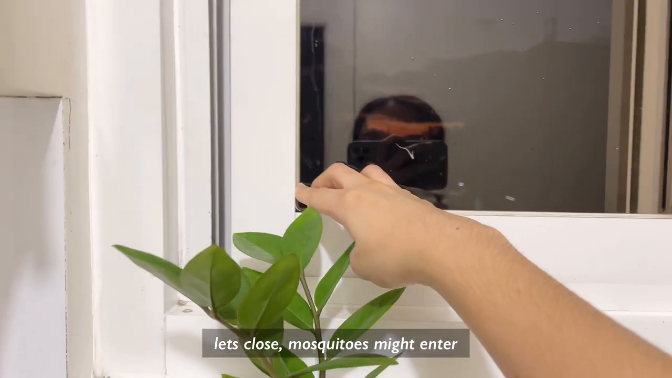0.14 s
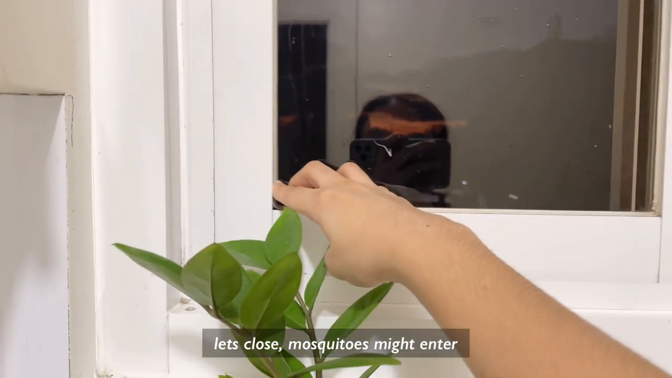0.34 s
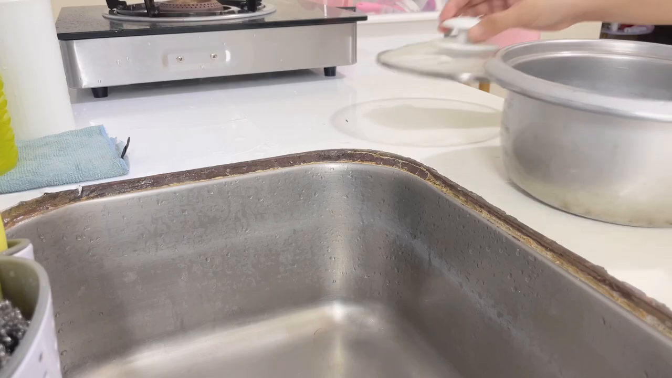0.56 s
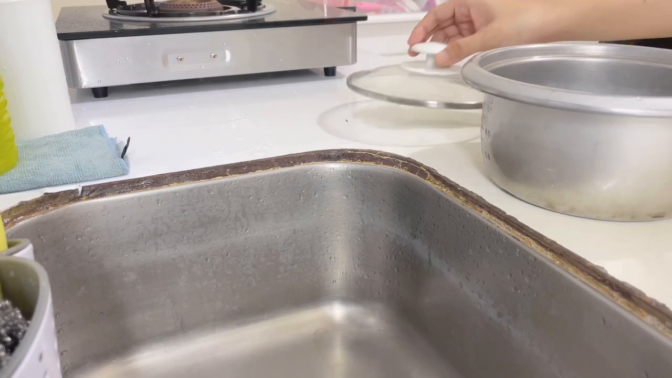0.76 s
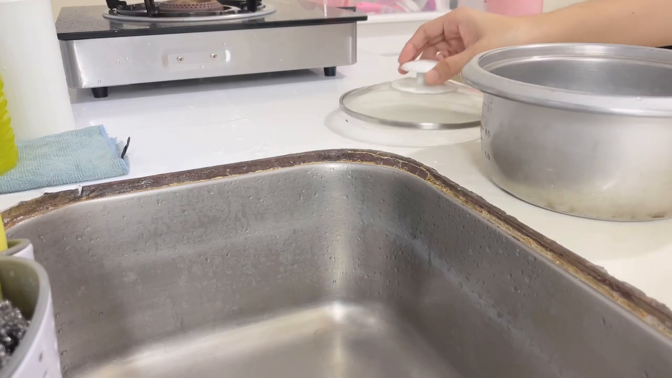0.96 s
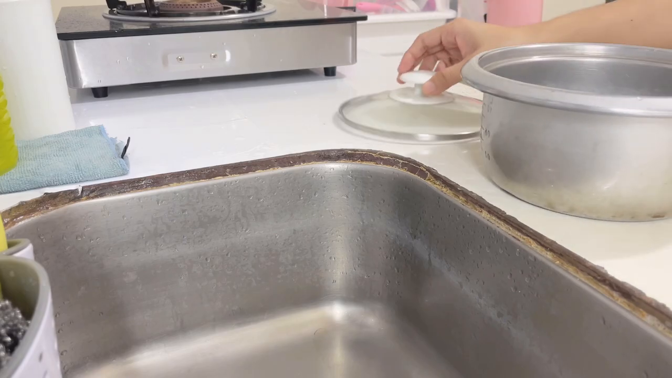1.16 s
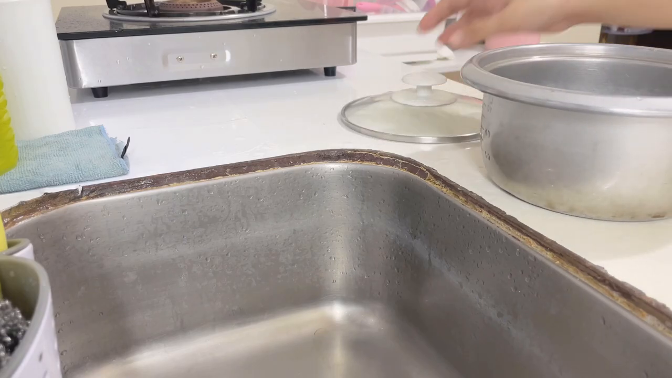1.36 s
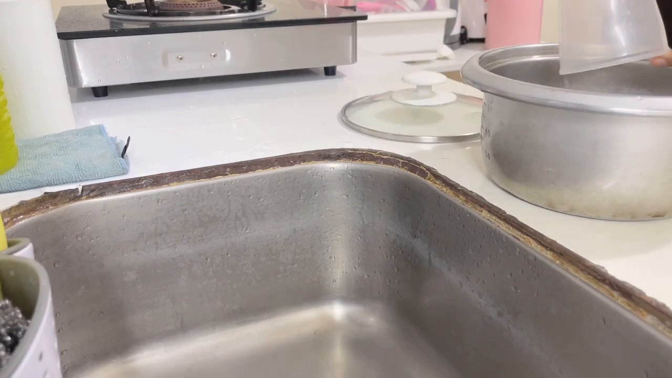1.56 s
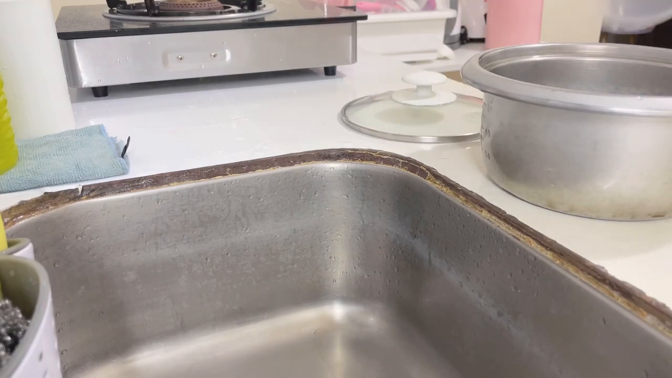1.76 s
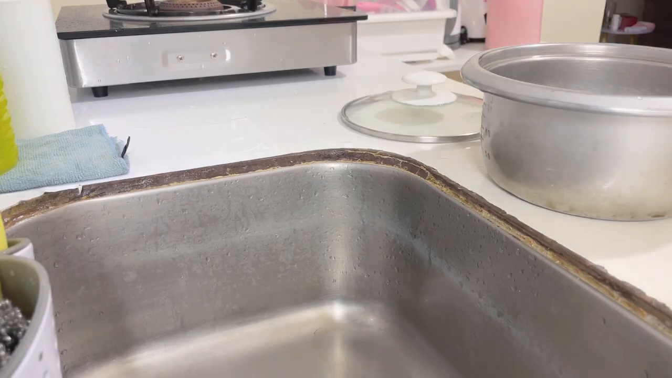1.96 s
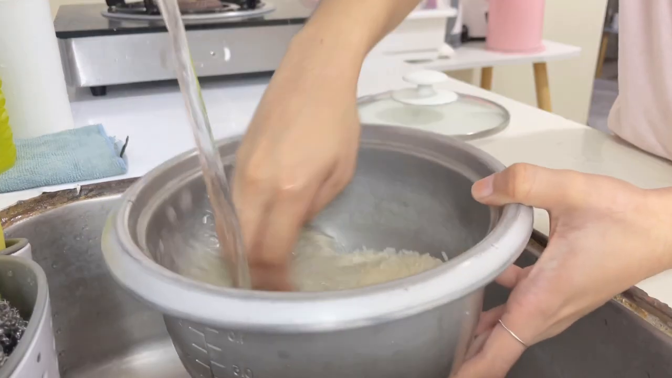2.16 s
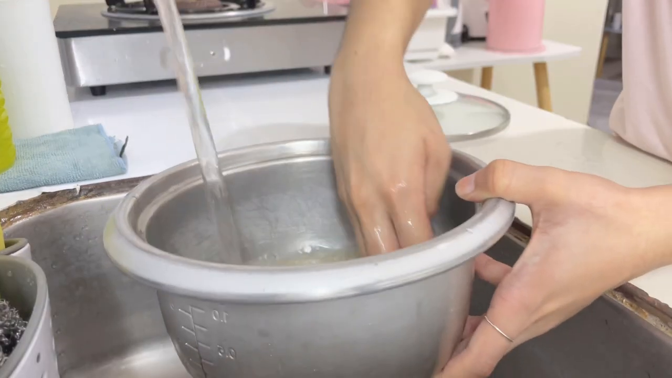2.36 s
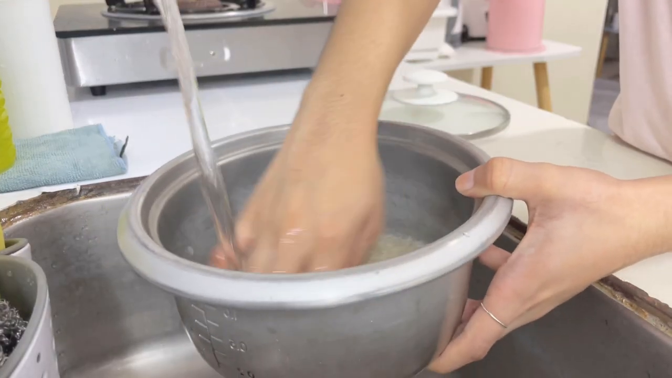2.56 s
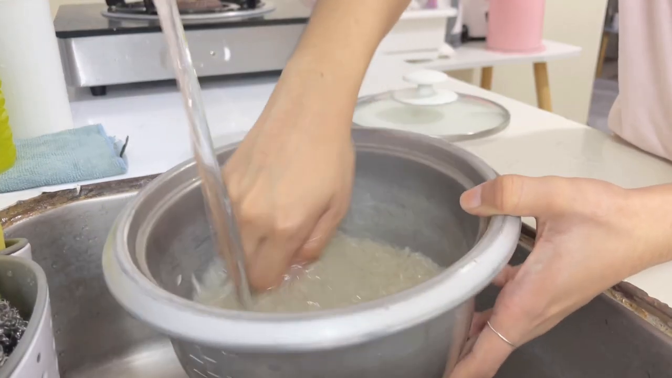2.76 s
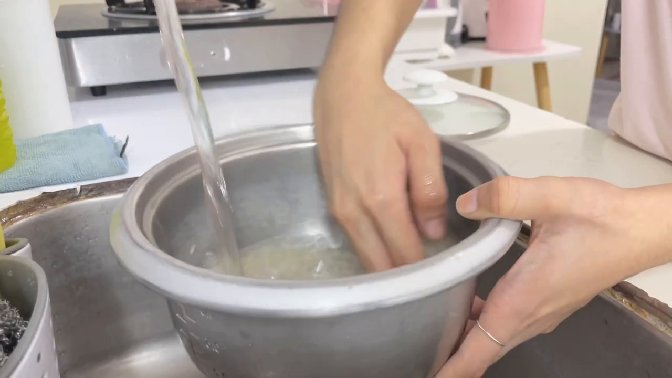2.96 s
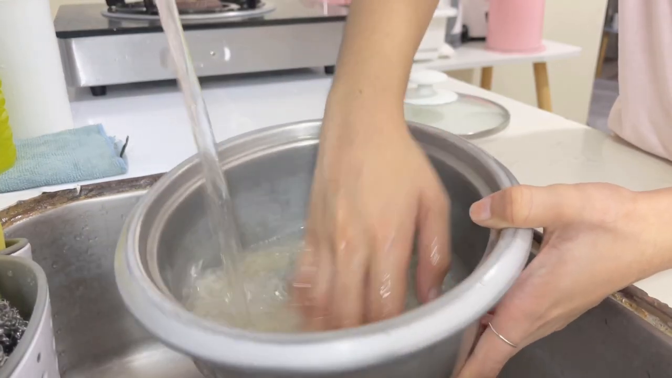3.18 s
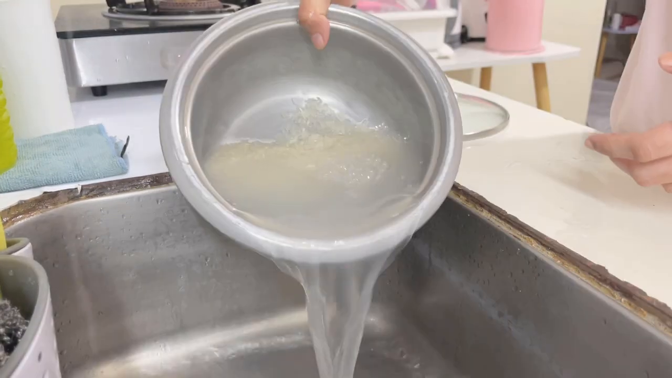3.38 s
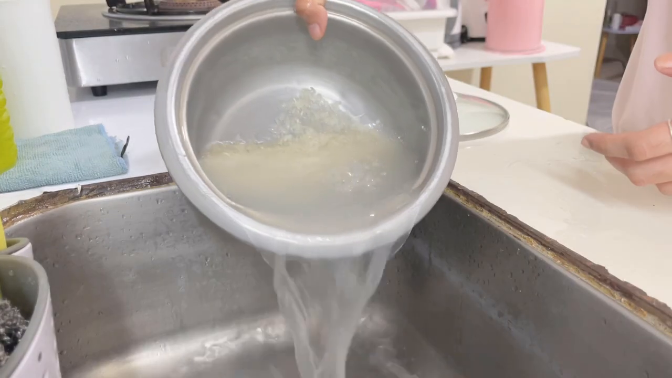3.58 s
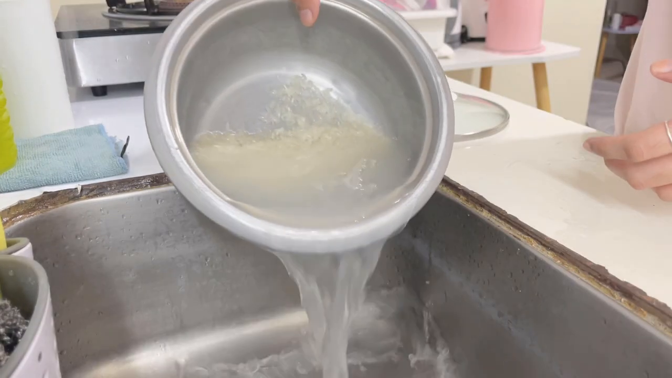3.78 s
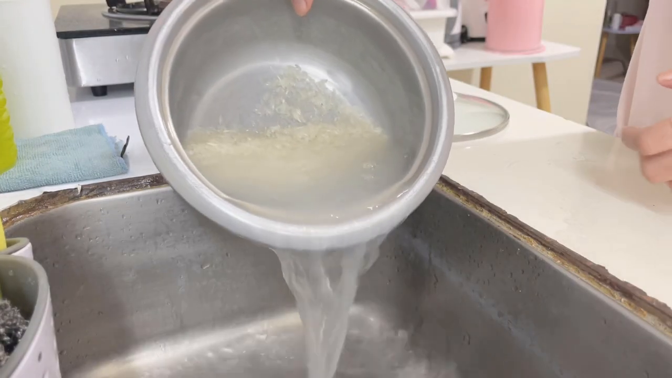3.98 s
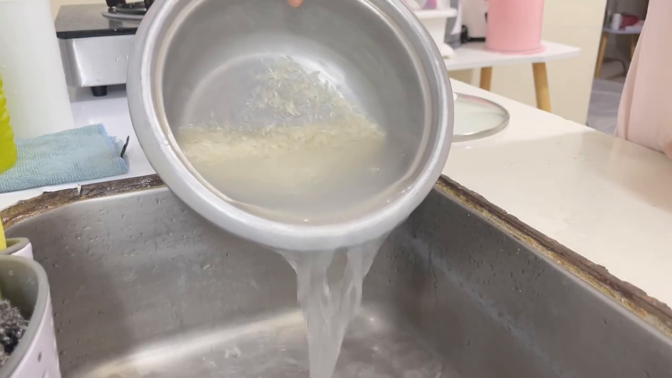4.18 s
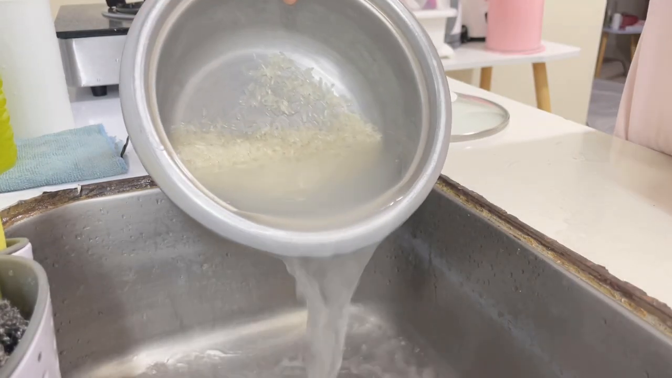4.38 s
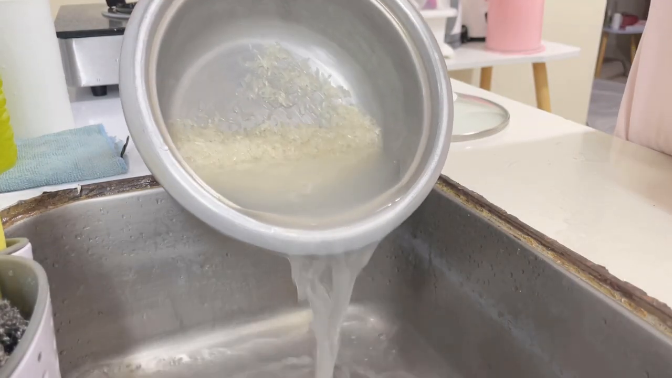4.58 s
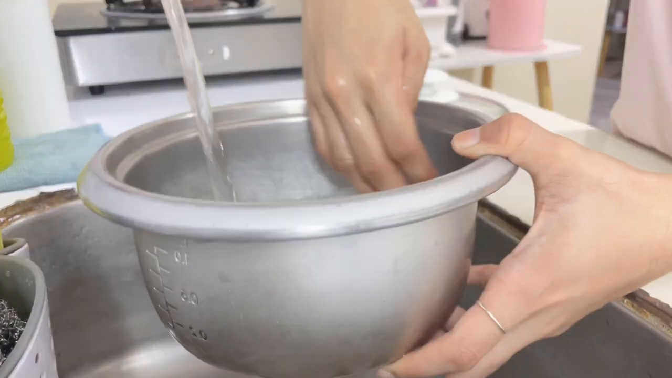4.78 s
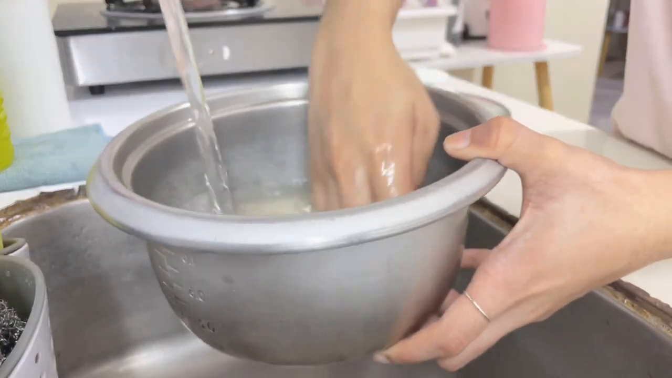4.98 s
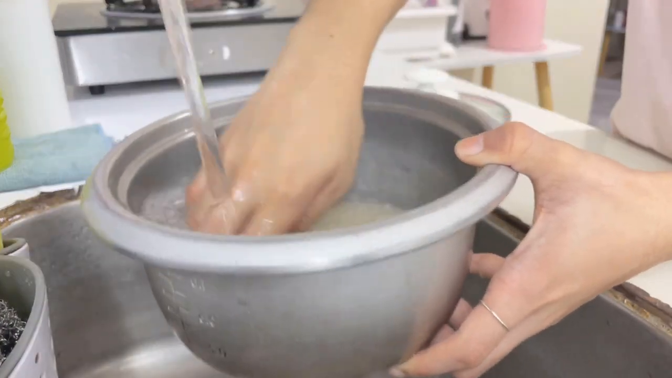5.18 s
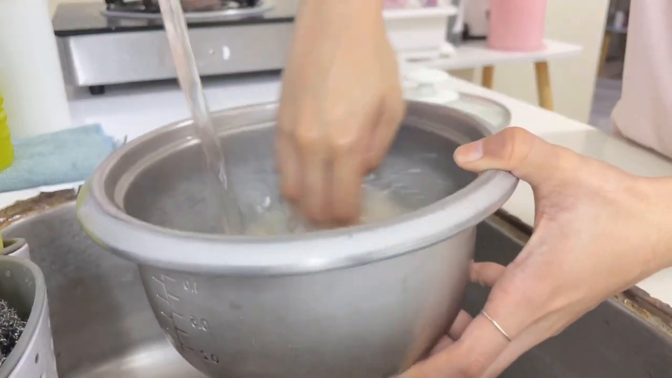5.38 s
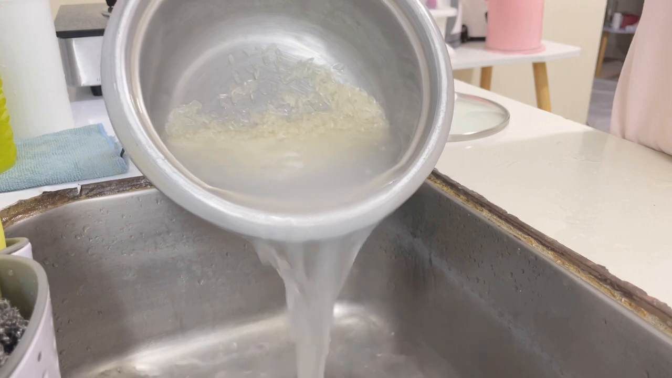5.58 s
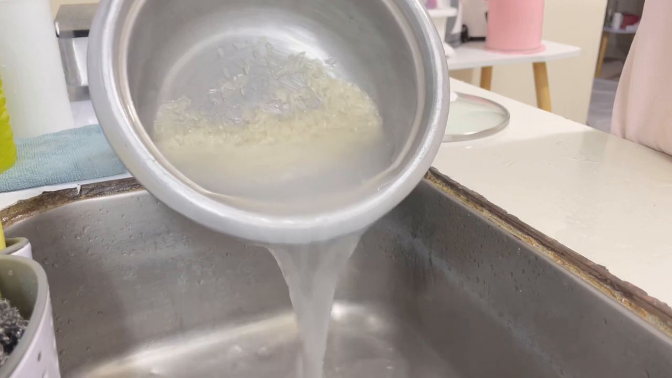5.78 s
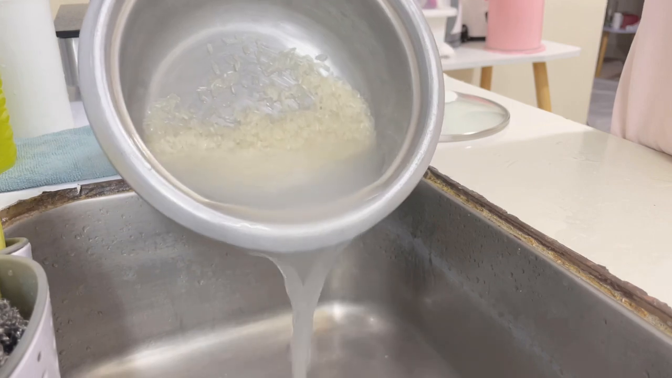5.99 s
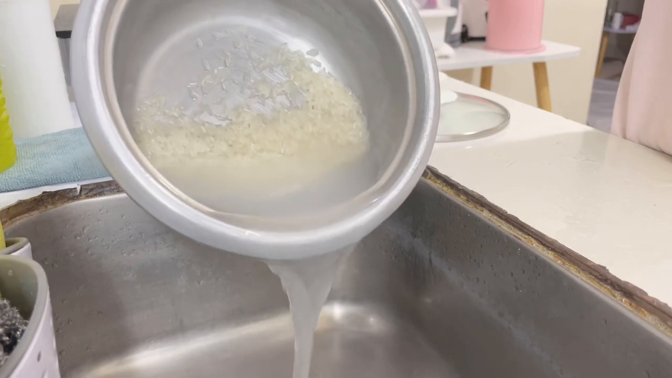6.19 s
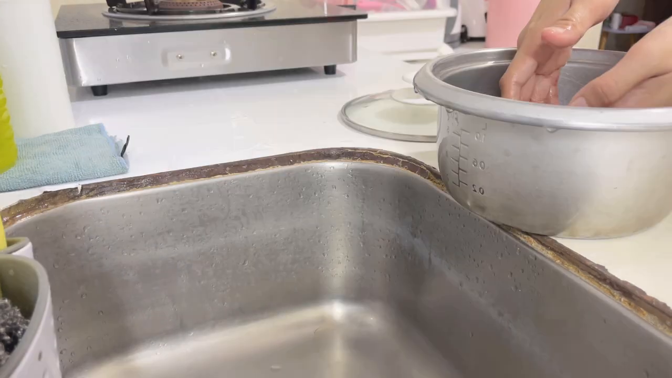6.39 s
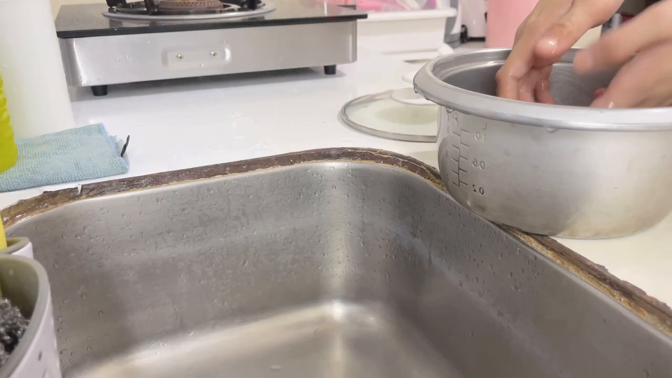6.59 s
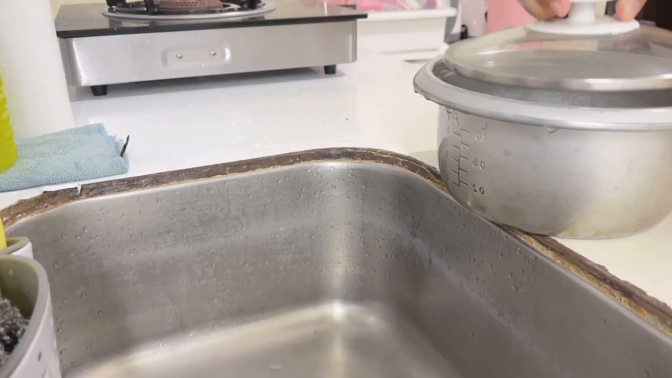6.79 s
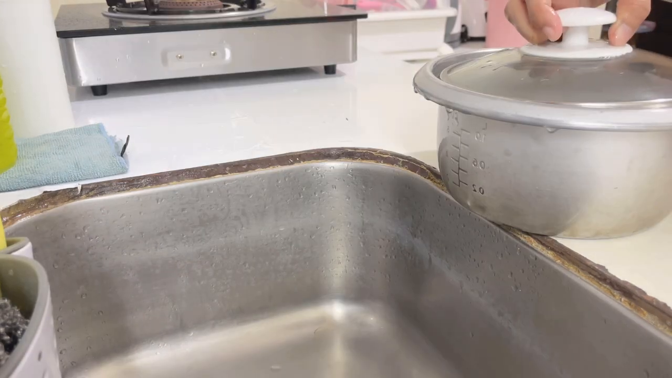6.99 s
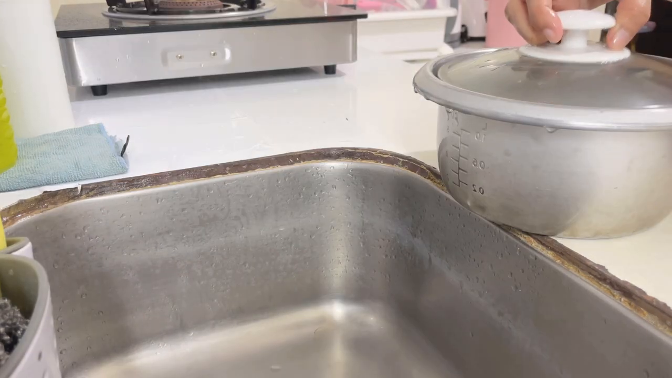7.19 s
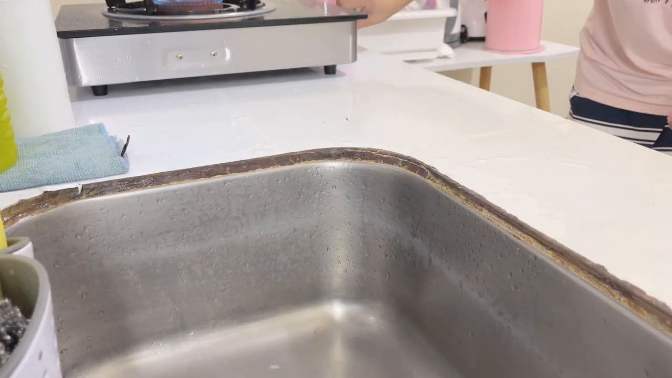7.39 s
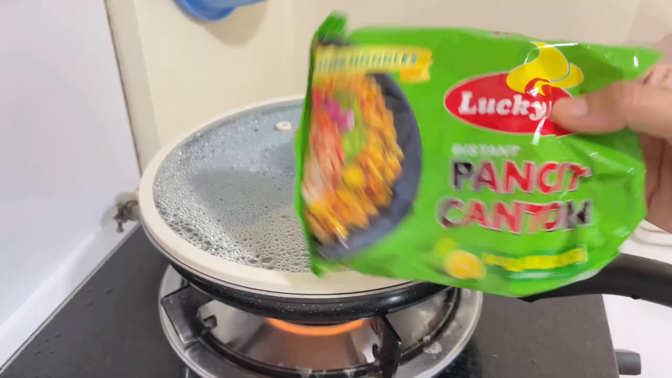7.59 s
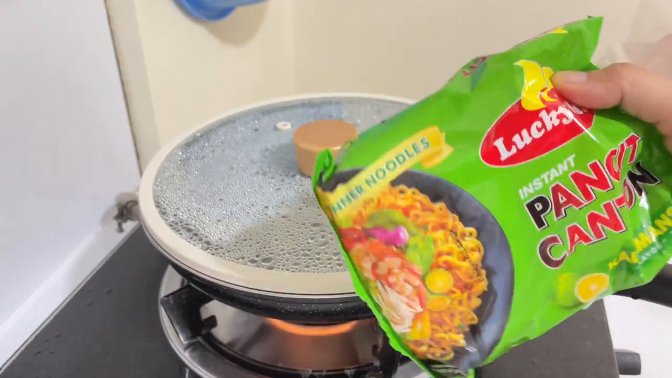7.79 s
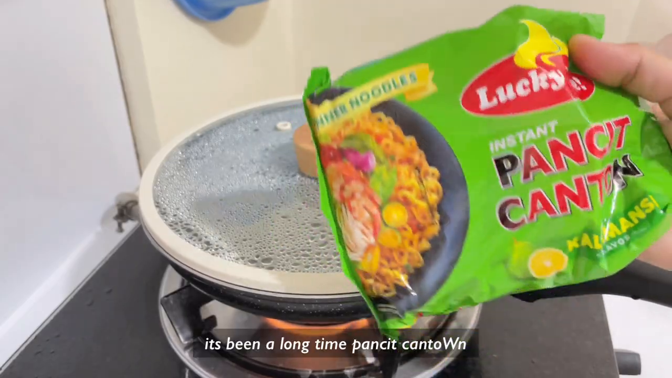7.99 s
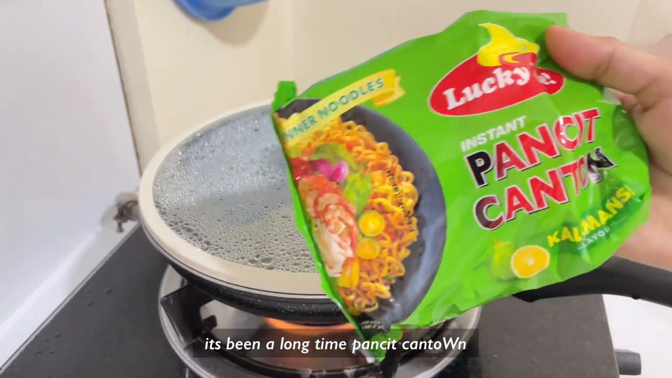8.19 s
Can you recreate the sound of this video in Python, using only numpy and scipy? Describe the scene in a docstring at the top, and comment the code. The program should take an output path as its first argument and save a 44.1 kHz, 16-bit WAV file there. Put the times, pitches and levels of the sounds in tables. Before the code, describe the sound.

Close, bright stereo kitchen sound with low room tone that steps in level at cuts. First a sliding window and low thud, glass lid knocks, and a brief swish of rice grains. Two rounds follow of hissing tap, sloshing hand and ringing pot wall, each ended by bubbly water splashing and drumming on the sink floor. Then metallic lid and pot clanks, a short quiet gap, and sharp crackling of plastic film beside a faint low hum.

```python
"""In a small kitchen a window slides shut, a glass lid is lifted and set down, and dry rice is poured.
Twice a tap runs into a metal pot and the water is tipped into a steel sink; the lid goes on, the pot is
lifted and a plastic packet crackles, over a room tone that steps in level. Solids ring as decaying modes,
friction and spray are shaped bursts of noise, bubbles are gliding decaying tones. The right channel is a
partly decorrelated version of the left."""
import sys
import numpy as np
from scipy import signal
from scipy.fft import rfft, irfft, next_fast_len
from scipy.io import wavfile
from scipy.ndimage import uniform_filter1d

SR = 44100
rng = np.random.default_rng(int(sys.argv[2]) if len(sys.argv) > 2 else 0)


def transcribe(signal):
    """Save signal, clipped to [-1, 1], as a 16-bit WAV file at the path in sys.argv[1]."""
    frames = np.atleast_2d(signal).T
    limited = np.clip(frames, -1, 1)
    pcm = np.round(limited * 32767).astype(np.int16)
    wavfile.write(sys.argv[1], SR, pcm)


N = 363825
T = np.arange(N) / SR
SIZE = next_fast_len(N + SR // 2)
LOG_HZ = np.log(np.arange(SIZE // 2 + 1) * SR / SIZE + 1)

# Room tone in successive stretches. Each row: start in seconds, level in dB.
ROOM_LEVELS = [(0, -30.5), (.47, -32.5), (1.44, -33.5), (6.41, -33), (7.576, -33.5)]
# Spectrum of the room tone. Each row: frequency in Hz, relative density in dB per Hz.
ROOM_SPECTRUM = [(30, -42), (52, -16), (75, -0.5), (120, -9), (160, -16.5), (215, -12), (350, -15.5),
                 (700, -22), (1300, -19), (2200, -26), (4000, -35.5), (7000, -47.5), (10000, -53),
                 (16000, -58)]
# Window sash grinding in its track. Each row: time in seconds, level in dB, treble over level in dB.
SASH_LEVEL = [(0.0, -26, -20), (0.07, -41, -7), (0.15, -41, -8), (0.18, -35.5, -9), (0.31, -45.5, -9),
              (0.4, -45, -24), (0.47, -57, -22)]
# Hollow of the window track. Each row: resonance in Hz, width in Hz, gain in dB.
TRACK_MODES = [(346, 79, 7), (1040, 130, -19)]
# Ring of that hollow. Each row: time in seconds, level in dB.
TRACK_LEVEL = [(0, -30), (.12, -41), (.28, -32), (.4, -36), (.47, -60)]
# Spectrum of spray and grinding. Each row: frequency in Hz, relative level in dB.
SPRAY_SPECTRUM = [(300, -11), (600, -9), (1200, -2.5), (2500, -1), (4000, -2), (6000, -4.5), (8000, -2.5),
                  (11000, -9), (16000, -11)]
# Spectrum of fine treble. Each row: frequency in Hz, relative level in dB.
FINE_SPECTRUM = [(5000, -17.5), (7000, -15), (9000, 4), (12000, -4.5), (13500, 2), (15000, -3),
                 (16000, -13)]

# Each row of every table of blows: time in seconds, peak of the ringing in dB, crack over peak in dB,
# rattle over peak in dB, favoured pitch in Hz, hardness (tilt of the modes) in dB per octave.
# Each row of every table of modes: frequency in Hz, relative level in dB, free decay by 60 dB in seconds.
# Window frame struck by the sash.
FRAME_BLOWS = [(.314, -19.5, -37, -1, 480, 25), (.325, -6, -41, -33, 104, 1),
               (.345, -17, -33, -36, 111, -26), (.369, -35, -27, -15, 109, -7),
               (.398, -14, -30, -9, 110, -14)]
FRAME_MODES = [(87, -3.5, 0.058), (128.5, -11, 0.42), (300, -35, 0.065), (480, -6, 0.04), (940, -14, 0.027),
               (1310, -17, 0.044), (2260, -19, 0.02)]
# Glass lid lifted from the rim, columns as above.
LIFT_BLOWS = [(.545, -5.5, -35, -29, 673, 0), (.547, -28, -35, -30, 1510, 2),
              (.551, -15, -40, -31, 1012, 0), (.575, -14, -38, -31, 1012, 3),
              (.571, -8, -31, -35, 660, 1.5), (.62, -8, -37, -34, 720, 0),
              (.629, -10.5, -40, -36, 603, -14), (.629, -24.5, -40, -27, 2401, 12),
              (.655, -17.5, -40, -23, 603, -4), (.682, -41, -38, -25, 1330, -2)]
LID_ON_RIM_MODES = [(393, -2.5, .07), (495, -3.5, 0.11), (603, -2, 0.13), (663, 1.5, 0.085),
                    (720, 5, 0.017), (1012, -8, 0.13), (1330, -16, 0.11), (1510, -8, 0.058),
                    (1740, -17, .05), (2401, -17, 0.12)]
# Glass lid set down, columns as above.
LID_BLOWS = [(1.119, 0, -34, -20, 191, -0.5), (1.12, -1, -30, -26, 433, -8), (1.124, -5, -32, -23, 870, -1),
             (1.163, 1.5, -36, -22.5, 855, 0), (1.181, 1, -40, -40, 851, 0.5),
             (1.193, -3, -32, -5.5, 1704, 1), (1.199, 11, -45, -32, 597, -0.5),
             (1.208, 2, -40, -30, 680, 4), (1.219, 6.5, -49, -19, 530, 0), (1.229, 0, -40, -27, 490, 1),
             (1.235, -6, -32, -20, 1704, 12), (1.243, 0, -43, -38, 391, 5.5),
             (1.262, -16, -28, -19, 391, -14), (1.279, -23, -30, -20, 2840, 7),
             (1.297, -11, -40, -15, 191, -4)]
LID_MODES = [(191, -9, 0.13), (296, 1.5, 0.057), (391, 2, 0.12), (433, 0, 0.09), (519, 1.5, 0.059),
             (592, -1, 0.083), (688, -2, 0.087), (855, -0.5, 0.053), (912, -6.5, 0.1), (1050, -2.5, 0.069),
             (1250, -10, 0.053), (1450, -14, .06), (1704, -3.5, 0.048), (1880, -8, 0.061), (1945, -9, .05),
             (2150, -20, 0.059), (2340, -23, 0.064), (2840, -17.5, 0.15), (3300, -24, 0.086),
             (4660, -13, 0.04)]
# Pot as the lid goes on and it is lifted, columns as above.
POT_BLOWS = [(6.809, -34, -11, -3, 2500, 13), (6.879, -21, -18, -11, 1890, 1),
             (6.888, 2, -14.5, -22, 415, 1), (6.89, -2.5, -30, -25, 178, -6),
             (6.925, -14, -30, -30, 2870, 6), (6.888, -2.5, -26, -32, 2010, -2),
             (6.888, -6.5, -5, -31, 1384, 0), (6.928, -10.5, -14, -11, 1890, 1),
             (6.968, 2.5, -9, -27.5, 258, 1.5), (6.968, 3.5, -30, -33, 176, 3),
             (6.97, -11, -30, -30, 2870, 7), (6.968, -11, -23, -32, 1082, -9),
             (6.968, -19, -25, -30, 4235, 2), (6.98, -7, -25, -33, 2530, 1),
             (7.094, -14, -30, -35, 258, -2), (7.16, -22.5, -6, -2, 1100, -3),
             (7.175, -14.5, -13, -6, 1110, 4), (7.191, 6, -23, -28, 258, 2), (7.191, -1, -23, -29, 964, -2),
             (7.191, -15, -22, -27, 3960, -6), (7.208, 0.5, -15.5, -35, 1140, 1),
             (7.205, -13, -25, -30, 2509, 5), (7.208, -13, -25, -30, 3430, 6),
             (7.21, -14, -25, -30, 4225, 8), (7.215, -6, -26, -43, 118, -8), (7.2, -4, -32, -37, 550, 0),
             (7.2, -8, -30, -35, 3900, 8), (7.215, -6, -30, -38, 2600, 9), (7.232, -8, -15, -43, 2509, 9),
             (7.235, -7, -30, -44, 1082, 5), (7.276, -25, -30, -42, 258, -3),
             (7.281, -10, -28, -46, 1179, 4), (7.377, -34.5, 2, 8.5, 154, 10),
             (7.378, -18, -27, -30, 118, -6)]
POT_MODES = [(118, -14.5, 0.4), (176.5, -3.5, 0.37), (258, 0.5, 0.078), (415, -4, 0.3), (535, -6, 0.16),
             (720, -7, 0.19), (964, 3, 0.036), (1082, 1.5, 0.059), (1179, 1, 0.066), (1270, -11, 0.11),
             (1384, -2.5, 0.12), (1890, -9.5, 0.22), (2150, 1, 0.031), (2509, -10, 0.2), (2610, -12, 0.21),
             (2870, -4, 0.092), (3430, -13, 0.13), (3900, -22, 0.11), (4225, -21, 0.16), (4340, -15, 0.1),
             (4830, -23.5, 0.16), (5750, -35, 0.1), (6250, -35, .1)]
# Sink floor struck, blow columns as above.
SINK_BLOWS = [(3.422, -7, -32, -25, 377, 0), (5.464, -3, -40, -31, 183, 0), (5.491, -6, -35, -30, 180, 0),
              (5.525, -5, -34, -24.5, 180, 0)]
# New contacts damp the low ring of earlier blows. Each row: time in seconds,
# 60 dB time in seconds of the added decay, frequency in Hz below which it acts.
POT_GRIPS = [(6.928, .045, 300), (6.968, 0.089, 500), (6.995, .14, 300), (7.21, 0.059, 500),
             (7.235, 0.058, 700), (7.3, .06, 1500), (7.35, .03, 500)]
# Spectrum of loose rattle. Each row: frequency in Hz, relative level in dB.
RATTLE_SPECTRUM = [(60, -12), (150, 7.5), (500, -3.5), (1000, -6.5), (2000, -6), (4000, -13), (8000, -23),
                   (16000, -36.5)]

# Treble hiss as the lid slides off the rim. Each row: time in seconds, level in dB.
RIM_LEVEL = [(0.545, -49), (0.849, -64), (0.855, -55), (0.937, -82), (1.11, -83)]
# Dry rice poured into the pot. Each row: time in seconds, level in dB, treble over level in dB.
RICE_LEVEL = [(1.443, -32.5, 8.5), (1.515, -30, -3), (1.555, -39.5, 22), (1.76, -61.5, 7), (2.0, -79, -10)]

# Tap running into the pot. Each row: start in seconds, end in seconds,
# aerator hiss at the start in dB, hiss at the end in dB.
TAP_RUNS = [(2.009, 3.34, -22.5, -29), (4.639, 5.47, -24, -28.5)]
# Spray as the hand moves in and out of the stream, one list a run. Each row: time in seconds, level in dB.
STREAM_LEVELS = [
    [(2.009, -18), (2.011, -17), (2.187, -28), (2.205, -21.5), (2.877, -24), (2.897, -25), (3.011, -23.5),
     (3.305, -22), (3.323, -18.5), (3.344, -24)],
    [(4.643, -23), (5.095, -23.5), (5.099, -25), (5.127, -23.5), (5.187, -20.5), (5.209, -25.5),
     (5.261, -21.5), (5.281, -24.5), (5.457, -22.5), (5.47, -24)],
]
# Ring of the pot wall as the hand stirs the rice, one list a run. Each row: time in seconds, level in dB.
STIR_LEVELS = [
    [(2.009, -29), (2.049, -33), (2.137, -41), (2.223, -24), (2.271, -35), (2.289, -29.5), (2.371, -26.5),
     (2.405, -33), (2.457, -22.5), (2.497, -34), (2.531, -18), (2.575, -48), (2.619, -32), (2.679, -62),
     (2.767, -36), (2.785, -21.5), (2.819, -33), (2.845, -25.5), (2.863, -26.5), (2.997, -18.5),
     (3.027, -28), (3.057, -23.5), (3.113, -39), (3.137, -25), (3.205, -25), (3.227, -33), (3.267, -26),
     (3.293, -41), (3.315, -30), (3.34, -35)],
    [(4.645, -24), (4.659, -26.5), (4.709, -23), (4.735, -40), (4.755, -23), (4.819, -24.5), (4.897, -31.5),
     (5.047, -24.5), (5.063, -24), (5.119, -22), (5.149, -35), (5.195, -28), (5.279, -25.5), (5.303, -24),
     (5.345, -32), (5.379, -28), (5.437, -38), (5.462, -24)],
]
# Hand slapping through the water. Each row: centre in seconds, spray gain in dB, 1/e half-length in seconds.
SLAPS = [(2.544, 5.5, 0.025), (2.918, 5, 0.016), (3.138, 0, 0.017), (3.19, 2.5, 0.023), (3.314, 0, 0.02),
         (4.89, 2.5, 0.014), (5.263, 4, 0.045)]
# Wall of the filled pot. Each row: resonance in Hz, width in Hz, gain in dB.
POT_FULL_MODES = [(379.5, 6, 0.5), (522, 33, -6), (691, 34, 0.5), (783, 45, -2), (1083, 73, -6),
                  (1500, 140, -10.5), (2333, 15, -8), (3200, 67, -21)]
# Wall of the tipped pot. Each row: resonance in Hz, width in Hz, gain in dB.
POT_TIPPED_MODES = [(1080, 24, 4), (1400, 100, -5.5), (1540, 45, 2), (2400, 290, -4), (2850, 370, -4)]
# Water tipped into the sink in gulps, one list a time. Each row: time in seconds, splash level in dB.
TIP_LEVELS = [
    [(3.34, -32), (3.4, -27), (3.53, -41.5), (3.62, -27.5), (3.8, -27), (4.02, -32.5), (4.13, -37),
     (4.18, -31), (4.4, -31), (4.49, -37), (4.55, -30), (4.64, -32)],
    [(5.462, -21), (5.58, -27.5), (5.73, -20.5), (5.84, -26.5), (6.0, -25.5), (6.15, -27.5), (6.3, -27.5),
     (6.408, -28.5)],
]
# Spectrum of splash. Each row: frequency in Hz, relative level in dB.
SPLASH_SPECTRUM = [(300, -9), (600, -6.5), (1200, -5), (2500, -1.5), (4500, 0), (6000, -7), (8000, -2),
                   (11000, -12.5), (16000, -33)]
# Loud bubbles in the pot as the hand stirs. Each row: time in seconds, amplitude in dB, pitch in Hz.
POT_PLOPS = [(2.015, -21.5, 1270), (2.086, -12, 2170), (2.198, -13, 1080), (2.235, -14, 1650),
             (2.3673, -11, 1400), (2.53, -14.5, 1140), (2.596, -15, 1540), (2.6654, -12, 3540),
             (2.7137, -8, 4900), (2.723, -11, 3000), (2.7694, -13, 3600), (2.7933, -13, 1080),
             (2.858, -6, 4850), (2.8983, -6.5, 2240), (2.92, -10, 4000), (2.93, -8, 3900),
             (2.931, -9, 2700), (3.0415, -11, 3400), (3.1396, -13, 1240), (3.1894, -6, 3620),
             (3.2266, -4, 4400), (3.2766, -9, 4060), (3.31, -12, 2900), (3.3204, -2, 4600),
             (4.6813, -17, 1400), (4.717, -15, 1410), (4.8704, -14, 2970), (5.23, -15, 1020),
             (5.247, -12, 1450), (5.258, -11, 3600), (5.3145, -14, 1350), (5.318, -13, 1900),
             (5.3754, -20, 1040), (5.465, -4, 4850), (5.5337, -4, 5300)]
# Loud bubbles in the sink. Each row: time in seconds, amplitude in dB, pitch in Hz.
SINK_PLOPS = [(3.377, -7, 1650), (3.385, -11, 2300), (3.385, -7, 4760), (3.42, -7, 3900), (3.43, -8, 4340),
              (3.456, -10, 4770), (3.503, -12.5, 4500), (3.527, -19, 1860), (3.553, -22, 1540),
              (3.591, -8.5, 1480), (3.595, -15, 3560), (3.637, -9.5, 1840), (3.66, -12, 3360),
              (3.663, -7.5, 5000), (3.688, -11, 2480), (3.758, -12, 4440), (3.784, -12.5, 4700),
              (3.786, -9, 2440), (3.795, -2, 4200), (3.798, -9, 3000), (3.842, -5.5, 4400),
              (3.865, -14, 2900), (3.93, -15, 2230), (3.967, -15, 1250), (3.985, -15, 2400),
              (3.985, -14, 4300), (4.014, -13, 4800), (4.03, -17, 3000), (4.064, -15, 883),
              (4.166, -7, 2270), (4.191, -22, 2000), (4.233, -13, 2380), (4.25, -18, 3300),
              (4.271, -23, 2770), (4.299, -14, 3400), (4.319, -14, 2760), (4.327, -18, 1540),
              (4.329, -11, 3700), (4.339, -14.5, 1840), (4.379, -10, 3140), (4.38, -8, 4500),
              (4.413, -24, 2150), (4.443, -10.5, 1060), (4.447, -11, 4040), (4.535, -15, 3200),
              (4.537, -14.5, 1815), (4.545, -11.5, 3460), (4.555, -18, 2970), (4.589, -10, 5200),
              (4.636, -16, 2000), (5.1, -6.5, 2720), (5.262, -2, 3060), (5.245, -6.5, 1810),
              (5.491, -6.5, 2730), (5.545, -16, 2850), (5.583, -9, 1040), (5.624, -8.5, 760),
              (5.625, -13, 1150), (5.659, -11, 2400), (5.663, -9, 1460), (5.667, -11, 1050),
              (5.689, -7, 2500), (5.705, -11, 2850), (5.713, -15, 1540), (5.724, -8, 1360),
              (5.76, -10.5, 1040), (5.777, -14, 2580), (5.853, -14, 2850), (5.873, -7, 2820),
              (5.912, -10, 2780), (5.912, -14.5, 1070), (5.927, -15, 1530), (5.944, -12, 2610),
              (5.968, -13, 1036), (5.994, -14, 2750), (6.05, -13, 2660), (6.069, -12, 2850),
              (6.075, -16, 1040), (6.078, -18, 1510), (6.101, -11, 1500), (6.116, -16, 1050),
              (6.175, -5, 4150), (6.187, -30, 1070), (6.219, -15, 2720), (6.235, -11, 2730),
              (6.243, -5, 4440), (6.301, -30, 1040), (6.333, -9, 2570), (6.343, -10, 2150),
              (6.359, -5.5, 3280), (6.371, -18, 1060), (6.393, 0, 4700), (6.401, -1.5, 3250),
              (6.402, 4, 4620)]
# Drops spitting on steel. Each row: time in seconds, level in dB before the treble colour.
SPITS = [(2.5542, -1), (2.7283, -22), (2.7697, -8), (3.1608, -8), (3.1947, -9), (3.3718, -19),
         (3.4551, -21), (3.519, -13), (3.5516, -12.5), (3.7834, -13), (3.833, -10), (3.867, -8),
         (3.9011, -17), (3.945, -13), (3.9999, -15), (4.1376, -19), (4.2733, -12), (4.2977, -12),
         (4.378, -14), (4.396, -15), (4.4409, -19), (4.5257, -14), (4.6429, -26), (4.8799, -6),
         (5.0276, -14), (5.064, -6), (5.1054, -8), (5.1767, -5), (5.6222, -17), (5.722, -15), (5.7868, -9),
         (5.8462, -18), (5.8781, -14), (5.9629, -14), (6.053, -9), (6.1483, -10), (6.1735, -9), (6.218, -8),
         (6.3565, -16), (6.4019, -11)]
# Water on the sink floor. Each row: time in seconds, drumming in dB, boom in dB.
FLOW_LEVEL = [(2.009, -40, -44), (3.25, -42.5, -41.5), (3.42, -24.5, -29), (3.6, -25.5, -26),
              (4.4, -18.5, -20), (4.5, -24, -21), (4.58, -20, -26), (4.7, -31.5, -24.5), (5.45, -30, -22.5),
              (5.49, -24, -21), (5.6, -20.5, -23), (6.0, -21.5, -21), (6.408, -24.5, -30)]
# Steel sink floor. Each row: resonance in Hz, width in Hz, gain in dB.
SINK_MODES = [(118, 6.9, 0.5), (181.4, 12.5, 1), (237.5, 12, 1.5), (273.4, 11, 1.5), (324, 44, -8),
              (371.3, 7.2, -1.5), (408, 11, -14), (530, 77, -12.5)]
# Deep mode of the sink. Each row: resonance in Hz, width in Hz, gain in dB.
SINK_BOOM_MODE = [(67.8, 10.7, 0)]

# Plastic packet in the hand. Each row: time in seconds, level in dB.
PACKET_LEVEL = [(7.575, -28.5), (7.65, -17), (7.79, -18), (7.86, -24), (7.95, -22.5), (8.1, -25),
                (8.16, -21), (8.25, -31)]
# Its sharpest creases. Each row: time in seconds, level in dB.
CREASES = [(7.5838, -10), (7.6123, -7), (7.6448, -9), (7.6565, -4), (7.673, 8.5), (7.6864, -24),
           (7.7052, 2), (7.713, -1), (7.7254, 0), (7.7502, -9), (7.7774, 1), (7.8384, -4), (7.8757, 6),
           (7.884, 5), (7.9121, -5), (7.9312, 2.5), (7.9424, 6.5), (7.964, 5.5), (7.9939, -6),
           (8.0143, 2.5), (8.0627, 4), (8.107, 0.5), (8.1444, -12), (8.1552, 4), (8.1744, 1), (8.1963, 2),
           (8.204, -3)]
# Spectrum of plastic film. Each row: frequency in Hz, relative level in dB.
FILM_SPECTRUM = [(300, -6.5), (700, -2.5), (1200, -2), (2200, -1.5), (4200, -3.5), (7000, -10.5),
                 (11000, -21), (16000, -41)]
# Low tone near the stove. Each row: centre in seconds, 1/e length in seconds, pitch in Hz, level in dB.
HUM_SWELLS = [(7.605, 0.049, 382.5, -15), (7.673, 0.061, 385, -26), (7.747, 0.09, 391, -22),
              (7.916, 0.072, 379, -30), (8.035, 0.1, 366.5, -27.5)]
# Stereo: right channel against left. Each row: frequency in Hz, likeness from 0 to 1, level in dB,
# phase in radians.
STEREO = [(60, .99, -1.5, 0), (150, .95, -2.5, 0), (380, .7, -5, -.3), (700, .55, -1.5, -.5),
          (2400, .45, -3.5, -.8), (5000, .45, -4, -.7), (6500, .55, -2, 1.2), (7900, .88, -1.5, 2.8),
          (8300, .99, 0, 3.08), (8900, .995, 0, 3.2), (10700, .85, 0, 4.5), (13400, .99, 0, 6.28),
          (16000, .99, 0, 6.28)]

TICK_DB, TICK_S = -4, 0.00074  # first contact of a blow: level over its crack, decay
KITCHEN_T60_S, KITCHEN_DB = 0.6, -16  # reverberant tail
OPENING_DB, OPENING_S = 7.5, 0.013  # the stream spurts in its first moment
FLICKER_DB, FLICKER_HZ = 1.5, 21.64  # random level steps before smoothing, steps per second
BUBBLE_GLIDE = 0.016  # half the share by which pitch rises in one decay time
BUBBLE_CYCLES, SMALL_HZ = 10.8, 3000  # longest ring of a loud bubble; above this pitch it bursts sooner
POP_DB, POP_S = -3, 0.0035  # burst of the bubble's skin
WALL_HZ, WALL_WAVER, WALL_DB = 712, 0.0296, -2  # pitch, spread of its steps before smoothing, level over stirring
STRAY_PLOP_DB, STRAY_SPIT_DB, STRAY_CREASE_DB = -4, 15, -3  # loudest chance events over the running level
PACKET_TREBLE_DB, CREASE_TREBLE_DB = -9.5, -2.5
TOP_HZ = 15900


def undb(db):
    """Logarithmic level: the amplitude gain of a level in dB."""
    return 10 ** (np.asarray(db) / 20)


def unit(x, lo_hz, hi_hz):
    """Band level: scale so that one band has rms 1."""
    sos = signal.butter(4, [lo_hz, hi_hz], "bandpass", fs=SR, output="sos")
    band = signal.sosfilt(sos, x)
    return x / np.sqrt(np.mean(band ** 2))


def along(table, axis=1):
    """Logarithmic pitch scale: a column of a (Hz, ..) table at every frequency bin."""
    rows = np.array(table)
    return np.interp(LOG_HZ, np.log(rows[:, 0]), rows[:, axis])


def colour(x, table):
    """Linear filtering: shape the spectrum by (Hz, dB) points."""
    return irfft(rfft(x, SIZE) * undb(along(table)), SIZE)[:N]


def ring(x, peaks):
    """Modal superposition: resonances of alternating sign, each with its table gain at the centre."""
    out = 0
    for k, (hz, width, db) in enumerate(peaks):
        b, a = signal.iirpeak(hz, hz / width, SR)
        out = out + (-1) ** k * undb(db) * signal.lfilter(b, a, x)
    return out


def played(tables, column=1, over=None):
    """Amplitude envelope: gain from a dB column of curve tables, silent outside them."""
    gain = np.zeros(N)
    for rows in map(np.array, tables):
        db = rows[:, column] + (rows[:, over] if over else 0)
        inside = (T >= rows[0, 0]) * (T <= rows[-1, 0])
        gain += undb(np.interp(T, rows[:, 0], db)) * inside
    return gain


def grains(rate, spread_db, smear_s):
    """Random impacts: noise bursts at a mean rate per second, strengths spread in dB, each dying away."""
    strengths = undb(spread_db * np.minimum(rng.exponential(size=N), 4))
    starts = (rng.random(N) < rate / SR) * strengths
    envelope = signal.lfilter([1], [1, -np.exp(-1 / (smear_s * SR))], starts)
    return envelope * rng.standard_normal(N)


def add(out, s, sound):
    """Superposition: mix a short sound in at a time in seconds."""
    i = int(s * SR)
    out[i:i + len(sound)] += sound[:N - i]


def wander(steps_hz):
    """Smoothed random process: normal steps averaged over one step length."""
    k = int(SR / steps_hz)
    return uniform_filter1d(np.repeat(rng.standard_normal(N // k + 1), k), k)[:N]


def flicker():
    """Amplitude modulation: a gain that wanders quickly around 1."""
    return undb(FLICKER_DB * wander(FLICKER_HZ))


def strays(gain, top_db, depth_db, count):
    """Chance events (s, dB, number 0-1) drawn uniformly in time, kept and levelled where a gain sounds."""
    s, size, pick = rng.random((count, 3)).T
    here = gain[(s * N).astype(int)]
    db = 20 * np.log10(here + 1e-9) + top_db - depth_db * size
    return np.transpose([s * N / SR, db, pick])[here > 0]


def room_tone():
    """Stationary noise: distant machines and street, stepping in level."""
    s, db = np.transpose(ROOM_LEVELS)
    level = undb(db[np.searchsorted(s, T, side="right") - 1])
    return level * unit(colour(rng.standard_normal(N), ROOM_SPECTRUM), 38.6, 8000)


def rustle(gain, treble_gain, body, lo_hz, hi_hz, rate, spread_db, smear_s):
    """Granular friction: dense tiny impacts with a body colour and a treble edge."""
    burst = grains(rate, spread_db, smear_s)
    treble = unit(colour(burst, FINE_SPECTRUM), 9100, 16000)
    return gain * unit(colour(burst, body), lo_hz, hi_hz) + treble_gain * treble


def sash():
    """Friction exciting a cavity: the sash grinds and the hollow of its track resonates."""
    treble = played([SASH_LEVEL], column=2, over=1)
    grinding = rustle(played([SASH_LEVEL]), treble, SPRAY_SPECTRUM, 700, 9000, 5500, 0.9, 0.0011)
    hollow = unit(ring(grains(2500, 1.1, 0.0036), TRACK_MODES), 250, 1100)
    return grinding + played([TRACK_LEVEL]) * hollow


def blows(events, modes, crack_s, rattle_s, favour_db=12, octaves=.3, detune=0, grips=()):
    """Modal impact: a blow rings modes, most those near its favoured pitch, cracks, and rattles."""
    tones, rattle, t = np.zeros(N), np.zeros(N), T[:SR // 2]
    hz, db, t60 = np.transpose(modes)[:, :, None]
    signs = (-1.) ** np.arange(len(hz))[:, None]
    for s, peak_db, crack_db, rattle_db, favoured_hz, hard_db in events:
        favour = favour_db * np.exp(-(np.log2(hz / favoured_hz) / octaves) ** 2)
        mix_db = db + favour + hard_db * np.log2(hz / 500)
        mix = signs * undb(mix_db + 1.5 * rng.standard_normal((len(hz), 1)))  # 1.5 dB scatter
        fading = t / t60
        for at, choke_s, below_hz in grips:
            if at > s + .002:
                fading = fading + (hz < below_hz) * np.maximum(s + t - at, 0) / choke_s
        pitch = hz * (1 + detune * rng.standard_normal((len(hz), 1)))
        ringing = np.sum(mix * np.sin(2 * np.pi * pitch * t) * 1000. ** -fading, axis=0)
        noise = signal.lfilter([1, -1], [1, -1.1, .4], rng.standard_normal(len(t)))
        crack = undb(crack_db) * noise * np.exp(-t / crack_s)
        tick = np.diff(rng.standard_normal(len(t) + 1)) * np.exp(-t / TICK_S)
        crack += undb(crack_db + TICK_DB) * tick
        add(tones, s, undb(peak_db) * (ringing / np.abs(ringing).max() + crack))
        add(rattle, s, undb(peak_db + rattle_db) * np.exp(-t / rattle_s))
    return tones + rattle * unit(colour(rng.standard_normal(N), RATTLE_SPECTRUM), 100, 4000)


def window_frame():
    """Modal impact: the sash knocks the frame."""
    return blows(FRAME_BLOWS, FRAME_MODES, 0.0053, 0.016)


def lid_knocks():
    """Boundary conditions set the modes: the glass rings one way on the rim, another when set down."""
    lifted = blows(LIFT_BLOWS, LID_ON_RIM_MODES, .0015, 0.023, octaves=0.056)
    return lifted + blows(LID_BLOWS, LID_MODES, 0.0014, 0.02, detune=0.014)


def rim_hiss():
    """Sliding friction: only the treble edge of fine grains, as the lid slides off the rim."""
    return rustle(0, played([RIM_LEVEL]), SPRAY_SPECTRUM, 700, 9000, 4000, 1.2, .003)


def rice():
    """Granular impact: dry grains hiss into the pot, swelling then thinning out."""
    treble = played([RICE_LEVEL], column=2, over=1)
    return rustle(played([RICE_LEVEL]), treble, SPRAY_SPECTRUM, 2900, 7500, 5400, 1.3, 0.0027)


def bubble(hz, cycles):
    """Bubble resonance: a pocket of air rings and rises in pitch as it nears the surface."""
    turns = hz * T[:int(4 * cycles / hz * SR)]
    tone = np.sin(2 * np.pi * turns * (1 + BUBBLE_GLIDE * turns / cycles))
    return tone * np.exp(-turns / cycles) * (1 - np.exp(-turns))


def water(spray_gain, fine_gain, wall_gain, pot, rate, spread_db, smear_s, band_hz, small_db,
          wall_rate, wall_spread_db, body):
    """Impact and bubble noise: drops burst on the surface, small bubbles chirp, and the pot wall resonates."""
    burst = grains(rate, spread_db, smear_s)
    small = np.zeros(N)
    for s, pitch, size in rng.random((3200, 3)):
        add(small, s * N / SR, bubble(900 * 6 ** pitch, 5.1) * undb(-26 * size))
    drops = unit(colour(burst, body), 1200, 6000)
    spray = unit(drops + undb(small_db) * unit(small, 1200, 6000), 1200, 6000)
    fine = unit(colour(burst, FINE_SPECTRUM), 11000, 15500)
    wall = unit(ring(grains(wall_rate, wall_spread_db, 0.0081), pot), *band_hz)
    return flicker() * (spray_gain * spray + fine_gain * fine) + flicker() * wall_gain * wall


def tap():
    """Jet noise: a stream whose hiss sinks as the pot fills, while the hand throws up spray."""
    spurt = undb(sum(OPENING_DB * np.exp(-np.abs(T - row[0]) / OPENING_S) for row in TAP_RUNS))
    slaps = undb(sum(db * np.exp(-((T - s) / length) ** 2) for s, db, length in SLAPS))
    hiss = played([[(a, first_db), (b, last_db)] for a, b, first_db, last_db in TAP_RUNS])
    return water(slaps * played(STREAM_LEVELS), spurt * hiss, undb(-0.5) * played(STIR_LEVELS),
                 POT_FULL_MODES, 4900, 0.82, 0.0042, (600, 800), -11,
                 wall_rate=1200, wall_spread_db=-6.0, body=SPRAY_SPECTRUM)


def wall_note():
    """Frequency modulation: the filled pot's main mode sings, its pitch pushed about by sloshing water."""
    phase = 2 * np.pi * np.cumsum(WALL_HZ * (1 + WALL_WAVER * wander(60))) / SR
    return np.sqrt(2) * undb(WALL_DB) * played(STIR_LEVELS) * np.sin(phase)


def sink_floor():
    """Forced plate vibration: the steel floor drums and booms under the water."""
    drumming = grains(400, 1.3, .008)
    floor = unit(ring(ring(drumming, SINK_MODES), [(220, 500, 0)]), 100, 450)
    boom = unit(ring(ring(drumming, SINK_BOOM_MODE), [(64, 60, 0)]), 45, 90)
    return flicker() * played([FLOW_LEVEL]) * floor + played([FLOW_LEVEL], column=2) * boom


def plops():
    """Bubble resonance: single loud bubbles, each with a pop of spray; small high ones burst sooner."""
    out, pops, t = np.zeros(N), np.zeros(N), T[:SR // 40]
    picks = strays(played(TIP_LEVELS), STRAY_PLOP_DB, 14.0, count=1100)
    chance = [(s, db, 1300 * 4.2 ** pick) for s, db, pick in picks]
    fall = np.exp(-t / POP_S) + 0.16 * np.exp(-t / 0.0024)
    for s, db, hz in SINK_PLOPS + POT_PLOPS + chance:
        add(out, s, undb(db) * bubble(hz, BUBBLE_CYCLES * min(hz / 1700, 1, SMALL_HZ / hz)))
        add(pops, s, undb(db + POP_DB) * min(1, 2000 / hz) * rng.standard_normal(len(t)) * fall)
    return out + colour(pops, SPLASH_SPECTRUM)


def spits():
    """Drop impact: a bright tick with a short hiss after it."""
    out, t = np.zeros(N), T[:SR // 30]
    fall = np.exp(-t / 0.0026) + 0.28 * np.exp(-t / 0.0037)
    for s, db, *_ in [*SPITS, *strays(played(TIP_LEVELS), STRAY_SPIT_DB, 10.0, count=160)]:
        add(out, s, undb(db) * rng.standard_normal(len(t)) * fall)
    return colour(out, FINE_SPECTRUM)


def tipping():
    """Splash noise: coarse bursts, fine spray and the ring of the tipped pot follow the gulps."""
    def over(gains_db):
        return sum(undb(db) * played([rows]) for db, rows in zip(gains_db, TIP_LEVELS))
    fine, wall = over((-5, -11)), over((-25, -7.5))  # dB over the splash, first and second time
    return water(played(TIP_LEVELS), fine, wall, POT_TIPPED_MODES, 1100, 1.3, 0.002, (900, 1200), -13.5,
                 wall_rate=350, wall_spread_db=2.5, body=SPLASH_SPECTRUM)


def sink_knocks():
    """Modal impact: blows ring the sink floor, with decay times inverse to the widths of its modes."""
    modes = [(hz, db, 2.0 / width) for hz, width, db in SINK_MODES]
    return blows(SINK_BLOWS, modes, .004, 0.083)


def pot_knocks():
    """Contact damping: blows ring the pot, and later contacts choke its low modes."""
    return blows(POT_BLOWS, POT_MODES, 0.012, 0.067, favour_db=18, octaves=0.15, grips=POT_GRIPS)


def packet():
    """Granular noise: the film crackles densely in the hand."""
    gain = played([PACKET_LEVEL])
    return rustle(gain, undb(PACKET_TREBLE_DB) * gain, FILM_SPECTRUM, 660, 7000, 1600, 1.3, 0.00087)


def creases():
    """Buckling: the film snaps in single impulses, each with a brief shiver."""
    snaps, t = np.zeros(N), T[:SR // 100]
    for s, db, *_ in [*CREASES, *strays(played([PACKET_LEVEL]), STRAY_CREASE_DB, 7.6, count=250)]:
        shiver = 0.095 * rng.standard_normal(len(t)) * np.exp(-t / 0.0029)
        add(snaps, s, undb(db) * ((t == 0) + shiver))

    def snapped(table):  # a lone impulse keeps its height
        return colour(snaps, table) / np.max(colour(1. * (T == 0), table))
    return snapped(FILM_SPECTRUM) + undb(CREASE_TREBLE_DB) * snapped(FINE_SPECTRUM)


def hum():
    """Pure tones under Gaussian envelopes: a low tone near the stove swells and fades."""
    out = np.zeros(N)
    for s, length, hz, db in HUM_SWELLS:
        swell = np.exp(-(2 * (T - s) / length) ** 2)
        out += np.sqrt(2) * undb(db) * swell * np.sin(2 * np.pi * hz * T)
    return out * (T > ROOM_LEVELS[-1][0])


def reverberant(x):
    """Reverberation: tiled walls return sharp sounds as a dull, exponentially decaying tail."""
    t = T[:SR // 2]
    tail = signal.lfilter([1], [1, -.7], rng.standard_normal(len(t)))
    tail = tail * 1000. ** (-t / KITCHEN_T60_S) * (t > .008)
    return x + undb(KITCHEN_DB) * signal.fftconvolve(x, tail / np.sqrt(np.sum(tail ** 2)))[:N]


def decorrelated(x, hold_s, tail_s):
    """Decorrelation: short decaying noise responses, crossfaded to a new random one every hold_s."""
    hop, t = int(hold_s * SR), T[:int(5 * tail_s * SR)]
    out = np.zeros(N + 3 * SR)
    fade = np.sin(np.pi * np.arange(2 * hop) / (2 * hop))
    x = np.concatenate([np.zeros(hop), x, np.zeros(2 * hop)])
    for i in range(0, N + hop, hop):
        response = rng.standard_normal(len(t)) * np.exp(-t / tail_s)
        part = signal.fftconvolve(x[i:i + 2 * hop] * fade, response / np.sqrt(np.sum(response ** 2)))
        out[i:i + len(part)] += part
    return out[hop:hop + N]


def scene():
    """Superposition: the sum of all sources, the same in both channels."""
    knocks = reverberant(window_frame() + lid_knocks() + sink_knocks() + pot_knocks() + creases())
    wet = tap() + wall_note() + sink_floor() + plops() + spits() + tipping()
    rubbing = sash() + rim_hiss() + rice() + packet()
    return np.tile(knocks + wet + rubbing + hum() + room_tone(), (2, 1))


def record(dry):
    """Partial coherence: the right channel blends dry and decorrelated sound; peaks clip, bass and top are cut."""
    like = np.clip(along(STEREO, axis=1), 0, 1)
    unlike = decorrelated(dry[1], hold_s=.04, tail_s=0.0047)
    blend = like * rfft(dry[1], SIZE) + np.sqrt(1 - like ** 2) * rfft(unlike, SIZE)
    turn = along(STEREO, axis=3)
    right = irfft(blend * undb(along(STEREO, axis=2)) * (np.cos(turn) + 1j * np.sin(turn)), SIZE)[:N]
    bass_cut = signal.butter(4, 44, "highpass", fs=SR, output="sos")
    loud = undb(-0.5) * signal.sosfilt(bass_cut, [dry[0], right])
    top_cut = signal.ellip(10, .2, 70, TOP_HZ, fs=SR, output="sos")
    return np.clip(signal.sosfilt(top_cut, np.clip(loud, -1, 1)), -1, 1)


dry = scene()
out = record(dry)
transcribe(out)
```